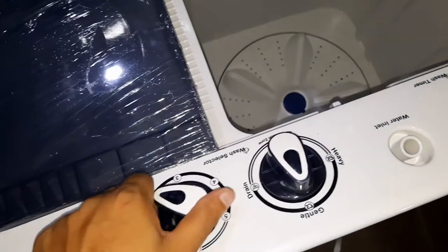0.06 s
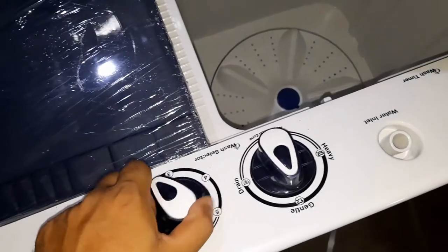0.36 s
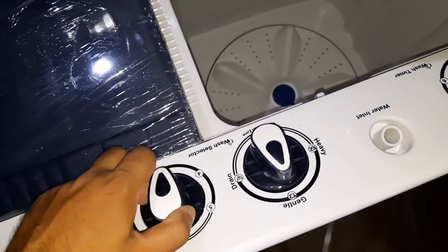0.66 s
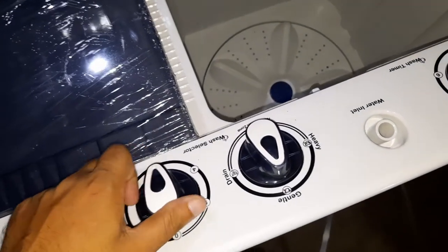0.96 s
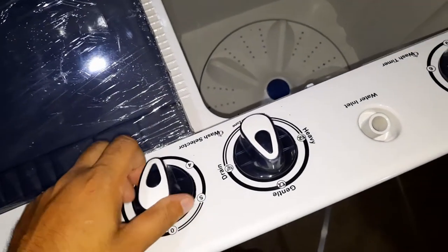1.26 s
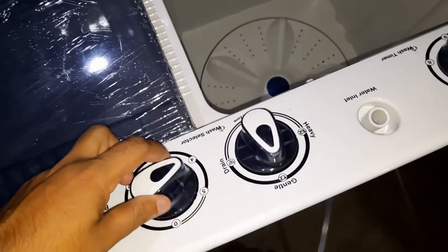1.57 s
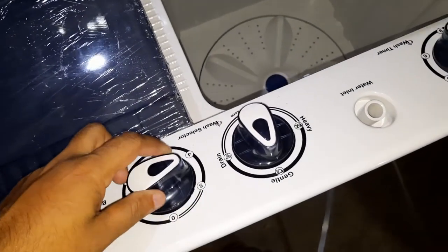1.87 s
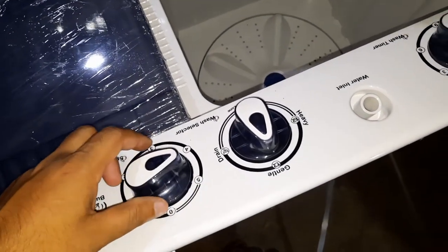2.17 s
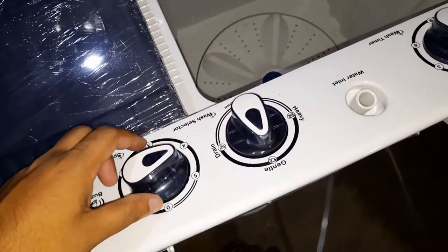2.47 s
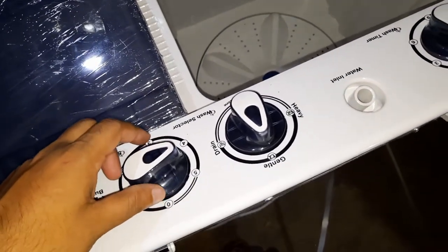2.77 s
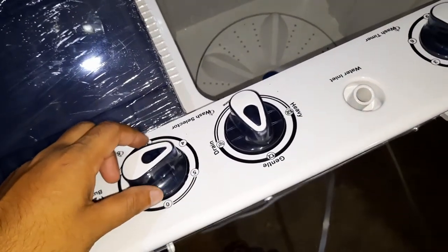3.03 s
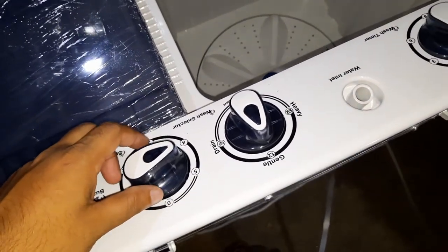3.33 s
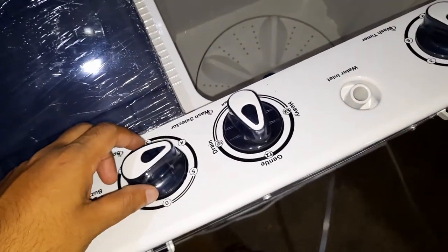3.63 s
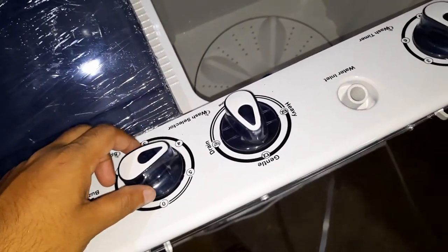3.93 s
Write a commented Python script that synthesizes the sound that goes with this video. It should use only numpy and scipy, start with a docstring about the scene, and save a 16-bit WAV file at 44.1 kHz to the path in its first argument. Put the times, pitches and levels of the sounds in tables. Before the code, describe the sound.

A washing machine knob ratchets round with clicks and knocks over a steady motor hum.

```python
"""A plastic twin-tub washing machine runs, its motor humming and shaking the cabinet, as a hand winds
the timer knob. The pawl clicks slowly, then races over grinding gears; the knob knocks against the
hollow panel and rings its modes, hardest near the end. Far behind, high paired chirps, perhaps
a cricket, repeat ten times a second over a fainter, lower trill."""
import sys
import numpy as np
from scipy import signal
from scipy.fft import rfft, irfft
from scipy.io import wavfile
from scipy.ndimage import uniform_filter1d

SR = 44100
rng = np.random.default_rng(int(sys.argv[2]) if len(sys.argv) > 2 else 0)


def to_wav(s):
    """Save 16-bit WAV."""
    ch = np.atleast_2d(s).T  # columns
    pcm = np.round(np.clip(ch, -1, 1) * 32767)  # PCM
    wavfile.write(sys.argv[1], SR, pcm.astype(np.int16))


N = 176400


def undb(db):
    """Decibels to gain."""
    return 10 ** (np.asarray(db) / 20)


def unit(x):
    """Scale to rms 1."""
    return x / np.sqrt(np.mean(x ** 2))


def pan(db):
    """Channel gains for a left-minus-right level."""
    return undb(np.array([[db], [-db]]) / 2)


def clock(size):
    """Sample times in seconds."""
    return np.arange(size) / SR


def over_hz(points, size, column=1):
    """Spread a table column over the bins of a spectrum, on a log frequency scale."""
    table = np.array(points, float)
    bin_hz = np.arange(size // 2 + 1) * SR / size
    return np.interp(np.log(bin_hz + 1), np.log(table[:, 0]), table[:, column])


def colour(x, points):
    """Minimum-phase EQ through (freq_hz, gain_db) points."""
    n = x.shape[-1]
    cepstrum = irfft(np.log(undb(over_hz(points, n))), n)
    cepstrum[1:n // 2] *= 2
    cepstrum[n // 2 + 1:] = 0
    return irfft(rfft(x) * np.exp(rfft(cepstrum)), n)


def walk(rate_hz):
    """Smooth random drift with rms 1."""
    hold = int(SR / rate_hz)
    steps = np.repeat(rng.standard_normal(N // hold + 1), hold)
    return unit(uniform_filter1d(uniform_filter1d(steps, hold), hold)[:N])


def drifting_phase(hz, wander, drift_hz):
    """Phase in radians of a cycle whose rate strays by the fraction `wander`."""
    return 2 * np.pi * np.cumsum(hz * (1 + wander * walk(drift_hz))) / SR


def add(out, x, start_s):
    """Mix a short sound in at its time."""
    i = max(int(start_s * SR), 0)
    out[..., i:i + x.shape[-1]] += x[..., :max(N - i, 0)]


def stereo_noise():
    """Noise that is nearly mono in the bass, wide and leaning right in the treble."""
    # stereo image: freq_hz, left_minus_right_db, likeness (0-1)
    image = [(100, 2.5, 0.88), (286, 1.5, 0.91), (700, 7, 0.7), (890, -0.5, 0.46), (1390, 1.5, 0.16),
             (2440, -0.5, 0.19), (4000, -1.5, 0), (5500, -5, 0), (12000, -7, 0.04)]
    likeness = np.clip(over_hz(image, N, column=2), 0, 1)
    shared = rfft(rng.standard_normal(N)) * np.sqrt(likeness)
    separate = rfft(rng.standard_normal((2, N))) * np.sqrt(1 - likeness)
    balance = undb(np.array([[1], [-1]]) * over_hz(image, N) / 2)
    noise = irfft((shared + separate) * balance, N)
    noise[1] = np.roll(noise[1], 5)  # the right side lags 5 samples
    return noise


def motor():
    """Shaft and mains tones hum, the cabinet throbs twice a turn and loose parts buzz."""
    # shaft tones: multiple, level_db
    shaft_tones = [(2, -55), (3, -47), (4, -44), (5, -47), (6, -40), (7, -46.5), (8, -59), (34, -48.5),
                   (36.3, -55.5), (38.3, -53)]
    # mains tones: multiple, level_db
    mains_tones = [(2, -46.5), (4, -64.5), (6, -36)]
    # spectrum of the shaken cabinet: freq_hz, gain_db
    cabinet_eq = [(25, -45), (60, -19.5), (110, -19.5), (150, -9), (190, -9.5), (222, -16.5), (270, -6.5),
                  (320, -3.5), (370, -3), (430, -8.5), (500, -9.5), (620, -12), (730, -17), (820, -11),
                  (1050, -20), (1350, -23.5), (1550, -26.5), (1750, -22.5), (2100, -29), (2700, -27),
                  (3300, -32.5), (4500, -37.5), (7000, -33), (9000, -47.5), (15500, -47)]
    # buzzing loose parts: pitch_hz, half_width_hz, level_db, beat_hz
    loose_parts = [(324.6, 17.5, -37.5, 23.3), (1380, 37, -57, 56)]
    shaft_hz, mains_hz, throb_depth = 23.16, 50, 0.079
    shaft = drifting_phase(shaft_hz, wander=0.002115, drift_hz=2.897)
    mains = 2 * np.pi * mains_hz * clock(N)
    hum = np.zeros(N)
    for phase, tones in ((shaft, shaft_tones), (mains, mains_tones)):
        for multiple, level_db in tones:
            gain = undb(level_db + 0.06 * walk(rate_hz=7.73))
            hum += gain * np.sin(multiple * phase + 2 * np.pi * rng.random())
    noise = stereo_noise()
    throb = 1 + throb_depth * np.sin(2 * shaft)
    shake = undb(-33.5) * unit(colour(noise * throb, cabinet_eq))
    for hz, half_width, level_db, beat_hz in loose_parts:
        beat = np.exp(0.74 * np.sin(drifting_phase(beat_hz, wander=0.0238, drift_hz=4.02)))
        drive = np.roll(noise, rng.integers(N), axis=1) * beat
        band = signal.butter(1, [hz - half_width, hz + half_width], "band", fs=SR, output="sos")
        buzz = signal.sosfilt(band, signal.sosfilt(band, drive))  # two passes for steeper skirts
        shake += undb(level_db) * unit(buzz)
    return hum * pan(2.5) + shake


def trill():
    """A faint, far-off trill: a narrow band of noise that pulses fast and swells in."""
    # fader ride: time_s, gain_db
    swell = [(0, -20), (.6, -2.5), (1, 1), (2.5, 0.5), (3.5, 4.5), (4, 3)]
    pitch_hz, half_width_hz, pulse_hz = 2604, 57, 52
    pulse = np.exp(0.74 * np.sin(drifting_phase(pulse_hz, wander=0.0202, drift_hz=3.6)))
    edges_hz = [pitch_hz - half_width_hz, pitch_hz + half_width_hz]
    band = signal.butter(2, edges_hz, "band", fs=SR, output="sos")
    whistle = signal.sosfilt(band, rng.standard_normal((2, N)))
    fader = undb(np.interp(clock(N), *np.array(swell).T))
    return undb(-54) * unit(whistle * pulse) * fader


def chirps():
    """Pairs of short falling whistles, heard directly on the right and smeared by the walls."""
    # how late each pair falls behind the beat: time_s, delay_s
    drift = [(0, 0.0096), (1, 0.0095), (2.05, 0.0044), (2.5, .012), (3.4, .0175), (4, 0.016)]
    # the two strokes of a pair: width_s, level_db
    strokes = [(.0021, -31), (.0028, -32)]
    # tone of the wall reflections: freq_hz, gain_db
    room_eq = [(5500, -12), (6300, 17), (6700, 12), (7100, 24), (7600, 4.5)]
    period_s, gap_s, room_decay_s = 0.1, 0.019, 0.023
    pitch_hz, scatter_hz, fall_hz_per_s = 6642, 45.3, 131000
    direct, wet = np.zeros(N), np.zeros((2, N))
    peak_s = clock(1024).mean()
    t = clock(1024) - peak_s
    room_fade = np.exp(-clock(8192) / room_decay_s)
    for beat_s in np.arange(0, N / SR, period_s):
        pair_s = beat_s + np.interp(beat_s, *np.array(drift).T)
        for k, (width_s, level_db) in enumerate(strokes):
            detune_hz, accent_db = rng.standard_normal(2) * [scatter_hz, 0.5]
            phase = 2 * np.pi * ((pitch_hz + detune_hz) * t - fall_hz_per_s * t ** 2 / 2)
            rasp = 1 + 0.083 * unit(uniform_filter1d(rng.standard_normal(len(t)), size=30))
            envelope = undb(level_db + accent_db) / np.cosh(t / width_s * np.sqrt(2))
            stroke = envelope * rasp * np.sin(phase)
            walls = room_fade * rng.standard_normal((2, len(room_fade)))
            start_s = pair_s + k * gap_s - peak_s
            add(direct, stroke, start_s)
            add(wet, signal.fftconvolve(stroke[None], walls, axes=1), start_s)
    room = unit(colour(wet, room_eq)) * direct.std() * undb(-2) * pan(-3)
    return direct * np.array([[0], [1]]) + room


def ratchet():
    """Each tooth under the timer's pawl gives a bright snap and a short rattle in the housing."""
    # pawl slipping over a tooth or just ticking against it: start_s, gain_db
    clicks = [(0.4926, -44), (0.5587, -29.5), (0.5872, -29.5), (.611, -30), (0.636, -30.5), (0.6833, -30),
              (1.236, -35.5), (1.2474, -35), (1.2607, -36), (1.2737, -32.5), (1.284, -35), (1.2975, -34),
              (1.3104, -31), (1.3174, -32.5), (1.328, -35), (1.3386, -34), (1.347, -35), (1.358, -40),
              (1.3684, -34), (1.3765, -35), (1.3873, -31.5), (1.397, -32), (1.4037, -30), (1.4158, -30),
              (1.428, -36), (1.4345, -33), (1.4457, -33), (1.458, -32), (1.467, -35), (1.481, -33),
              (1.4925, -34), (1.4986, -30), (1.5152, -35), (1.5244, -26), (1.540, -28), (1.5551, -28.5),
              (1.5698, -29), (1.5838, -28.5), (1.604, -27), (1.6309, -27.5), (1.6522, -26.5),
              (1.6795, -27.5), (1.7077, -22), (1.7666, -43), (1.868, -43)]
    # snaps get shorter as the spring winds up: time_s, speed_factor
    tightening = [(.56, 1.25), (1.3, 0.89), (1.55, 1.83), (1.71, 2.44)]
    # tone of a click: freq_hz, left_db, right_db
    click_eq = [(300, -19, 0), (1054, 13.5, -17), (1910, -20, -10), (2800, -9, -7), (3930, 3.5, -2.5),
                (5000, -18, -4), (5580, 2, 4.5), (6400, 5, 11.5), (7370, 10, 5), (8430, 2.5, -22),
                (9000, -17, 0), (10300, -5, -0.5), (11300, -3, -4), (13200, 0.5, 2.5), (14600, -10, -3),
                (15700, 1, -7)]
    attack_s, snap_s, rattle_s = 0.00069, 0.0018, 0.014  # attack and snap at speed 1
    out, t = np.zeros((2, N)), clock(4096)
    for start_s, gain_db in clicks:
        speed = np.interp(start_s, *np.array(tightening).T)
        attack = 1 - np.exp(-t * speed / attack_s)
        snap = np.exp(-t * speed / snap_s) * np.sqrt(speed)
        rattle = undb(-4.5) * np.exp(-t / rattle_s) / speed
        envelope = undb(gain_db + 1.5) * attack * (snap + rattle)
        add(out, envelope * rng.standard_normal((2, len(t))), start_s)
    return np.array([colour(out[ch], np.array(click_eq)[:, [0, ch + 1]]) for ch in range(2)])


def gears():
    """Uneven gear teeth buzz and rub through the panel; the pitch follows the speed of the knob."""
    # gears meshing while the knob turns fast: time_s, level_db, teeth_per_s
    winding = [(1.191, -43, 210), (1.28, -38, 247), (1.38, -37.5, 305), (1.48, -38, 277), (1.6, -43, 200),
               (1.762, -63, 140)]
    # tone of the gears through the panel: freq_hz, gain_db
    gear_eq = [(200, -35), (330, 0), (560, 7), (720, -6), (900, -2.5), (1200, -1.5), (1500, -18),
               (1850, -13.5), (3000, -21.5), (5000, -21)]
    time_s, level_db, teeth_per_s = np.array(winding).T
    mesh = drifting_phase(np.interp(clock(N), time_s, teeth_per_s), wander=0.02, drift_hz=120)
    teeth_passed = np.floor(mesh / (2 * np.pi))
    taps = np.diff(teeth_passed, prepend=0) * undb(5.2 * rng.standard_normal(N))
    rub = undb(1.5) * rng.standard_normal((2, N))
    grind = unit(colour(unit(taps) + rub, gear_eq))
    low_cut = signal.butter(2, 150, "high", fs=SR, output="sos")
    fader = undb(np.interp(clock(N), time_s, level_db, left=-120, right=-120))
    return signal.sosfilt(low_cut, grind) * fader * pan(5.4)


def knocks():
    """Each blow of the knob cracks, rings the panel's modes and dies away in the room."""
    # knob knocking and rebounding against the panel: start_s, gain_db, cutoff_hz
    blows = [(1.2047, -23, 3500), (1.2225, -14.5, 3500), (1.2286, -6.5, 2600), (1.2352, -8, 646),
             (1.2365, -16.5, 4000), (2.285, -10, 400), (2.32, -16, 1350), (2.439, -13, 1050),
             (3.629, -0.5, 3650), (3.6299, -18.5, 12000), (3.6347, -12, 800), (3.637, -21.5, 12000)]
    # modes of the hollow panel: pitch_hz, gain_db, t60_s
    modes = [(302, -2.5, 0.12), (408, -12, 0.12), (488, -11, 0.13), (690, -20, 0.031), (1027, -18.5, 0.093),
             (1258, 0.5, 0.022), (1468, -4.5, 0.028), (1620, 0.5, 0.017), (1860, -2, 0.019),
             (2310, -11, 0.045), (2770, -6, 0.023), (3136, -2, 0.011), (3500, -19, 0.042), (6800, -5, .025)]
    # tone of the crack and its room tail: freq_hz, gain_db
    crack_eq = [(80, -17), (250, 12), (450, 26), (1100, 16.5), (1900, 12.5), (3300, -1.5), (4500, 2.5),
                (7000, 3.5), (15000, -8)]
    attack_s, crack_s, tail_s, right_lag_samples = 0.00098, 0.0011, 0.025, 4
    out, t = np.zeros((2, N)), clock(16384)
    ring_t = np.maximum(t - np.array([[0], [right_lag_samples / SR]]), 0)
    ring = np.zeros_like(ring_t)
    for k, (hz, gain_db, t60_s) in enumerate(modes):
        polarity = (-1) ** (k // 2)
        ring += polarity * undb(gain_db - 60 * ring_t / t60_s) * np.sin(2 * np.pi * hz * ring_t)
    crack_envelope = undb(7.5) * np.exp(-t / crack_s) * (1 - np.exp(-t / attack_s))
    tail_envelope = undb(-6) * np.exp(-t / tail_s)
    for start_s, gain_db, cutoff_hz in blows:
        crack, tail = (unit(colour(rng.standard_normal((2, len(t))), crack_eq)) for _ in range(2))
        crack[1] = 0.7 * (np.roll(crack[0], right_lag_samples) + crack[1])
        blow = ring + crack * crack_envelope + tail * tail_envelope
        dulled = signal.lfilter(*signal.butter(2, cutoff_hz, fs=SR), blow)
        add(out, undb(gain_db - 11) * dulled, start_s)
    low_cut = signal.butter(2, 237, "high", fs=SR, output="sos")  # the panel radiates little bass
    return signal.sosfilt(low_cut, out) * pan(-1.5)


def scene():
    """The timer knob up front, over the running machine and the distant trill and chirps."""
    return ratchet() + gears() + knocks() + motor() + trill() + chirps()


def record(dry):
    """A steep low-pass takes the very top off the mix."""
    cutoff_hz = 15750
    return signal.sosfilt(signal.ellip(10, 0.2, 80, cutoff_hz, fs=SR, output="sos"), dry)


dry = scene()
out = record(dry)
to_wav(out)
```